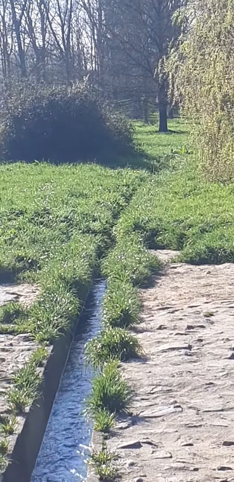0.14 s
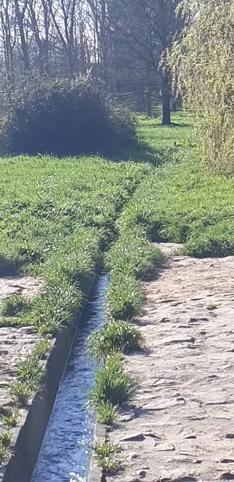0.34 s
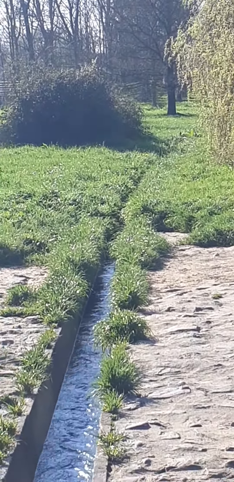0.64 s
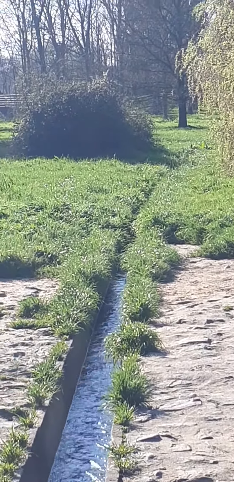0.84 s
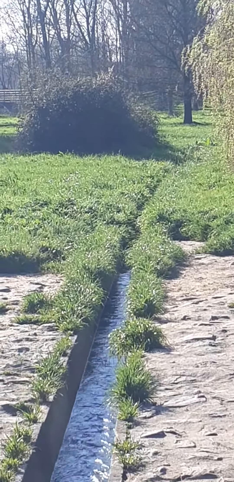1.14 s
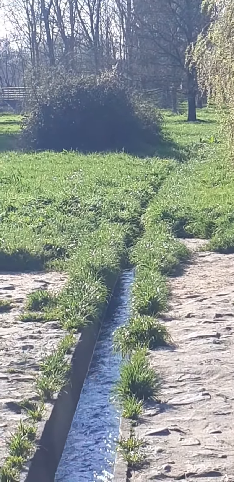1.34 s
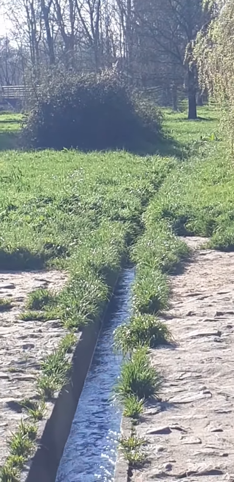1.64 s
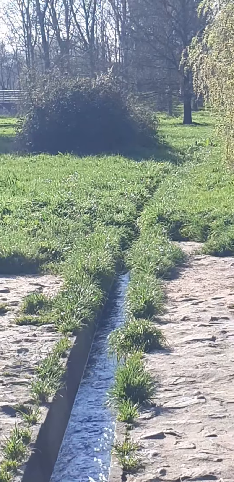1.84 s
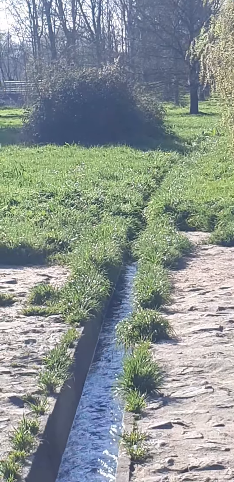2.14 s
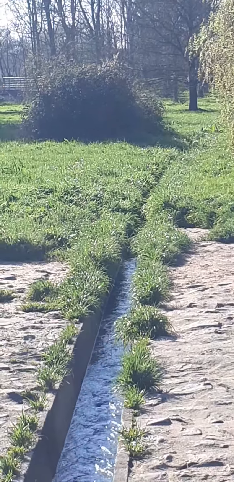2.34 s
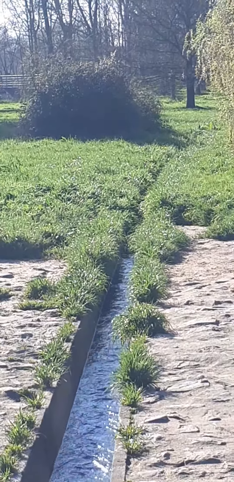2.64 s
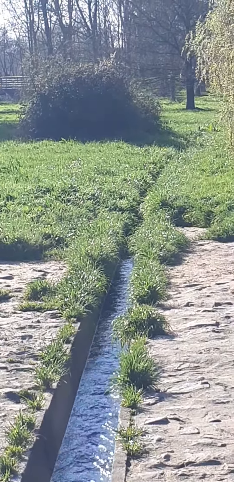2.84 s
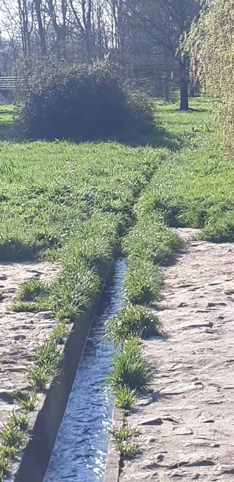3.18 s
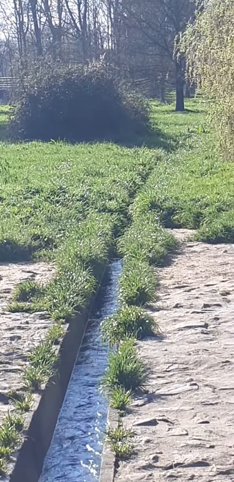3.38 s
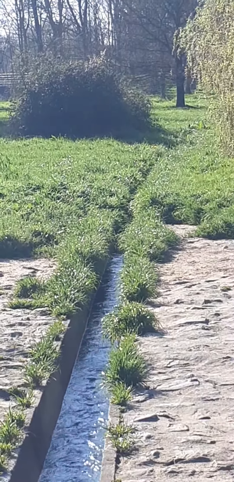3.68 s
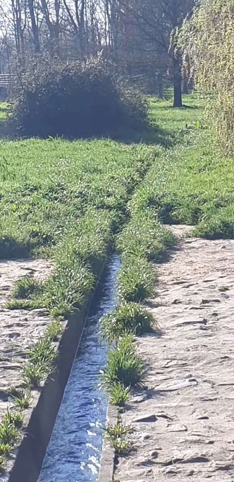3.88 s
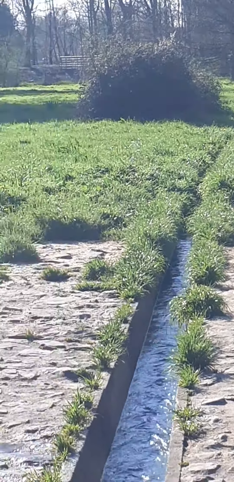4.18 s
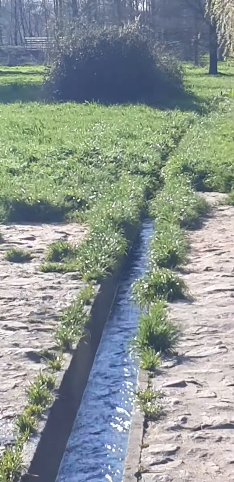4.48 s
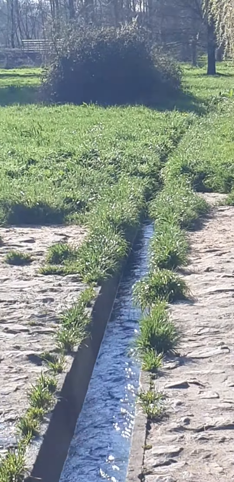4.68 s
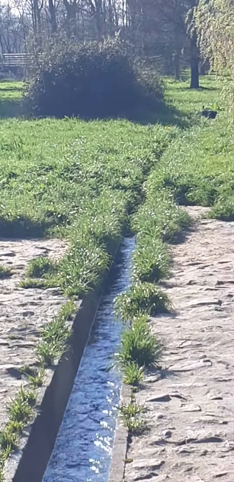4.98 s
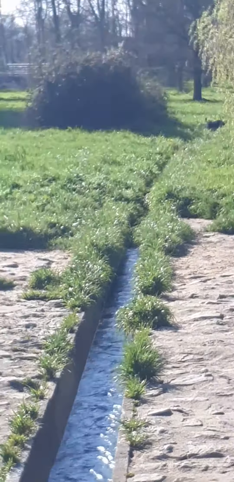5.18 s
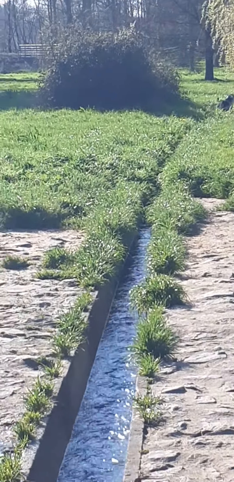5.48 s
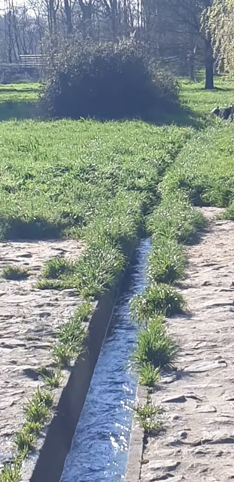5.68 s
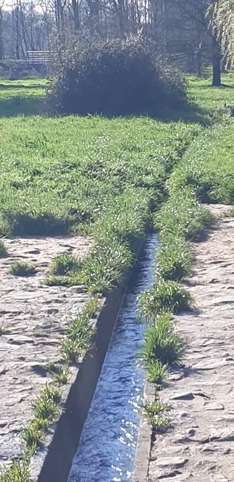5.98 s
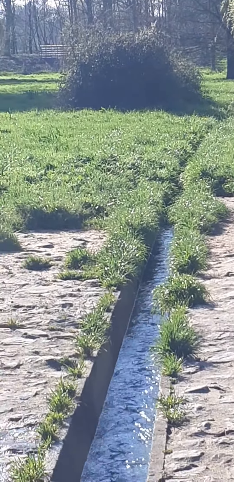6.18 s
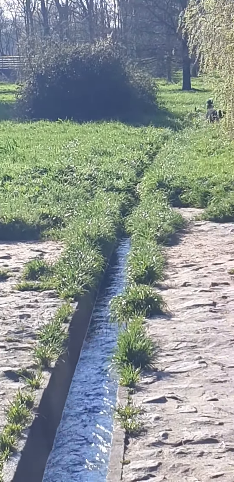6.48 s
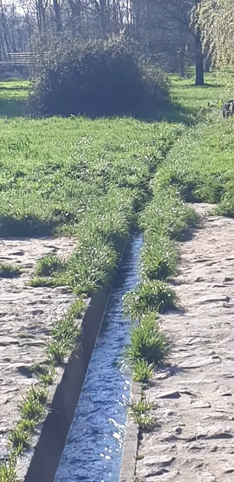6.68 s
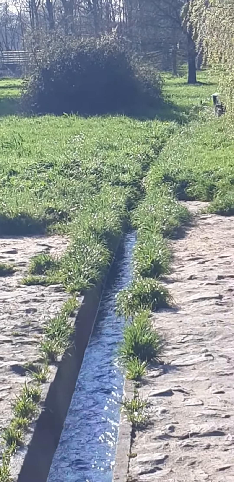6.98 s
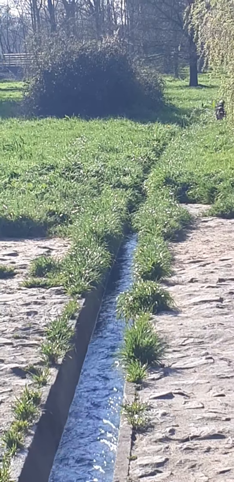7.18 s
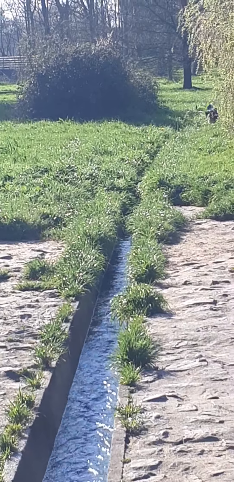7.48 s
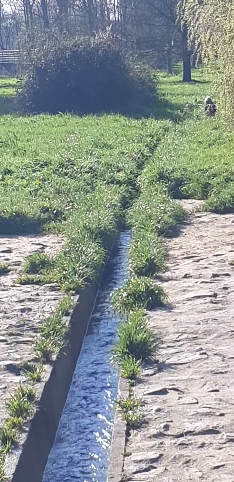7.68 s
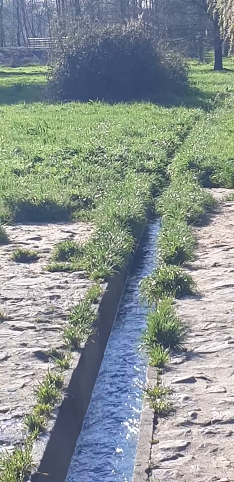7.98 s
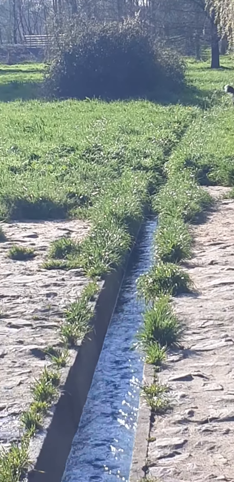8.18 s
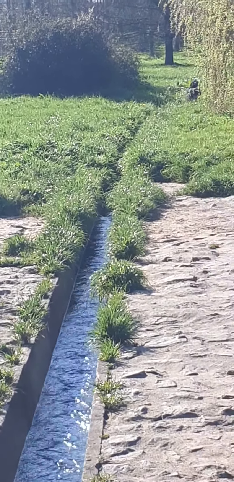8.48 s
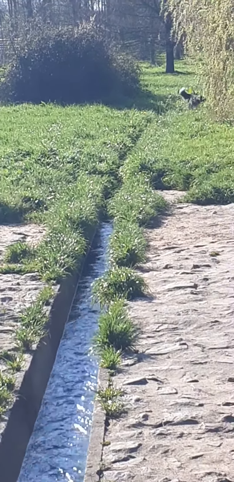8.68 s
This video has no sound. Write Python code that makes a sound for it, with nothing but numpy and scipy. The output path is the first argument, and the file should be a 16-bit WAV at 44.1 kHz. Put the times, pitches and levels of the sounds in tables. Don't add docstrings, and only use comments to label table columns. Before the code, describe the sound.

Water trickles and plops along a shallow stone channel while a far engine hums away, then a sharp knock and finger fumbling hit the microphone.

```python
import sys
import numpy as np
from scipy import signal
from scipy.fft import rfft, irfft, next_fast_len
from scipy.io import wavfile
from scipy.ndimage import uniform_filter1d

SR = 44100
rng = np.random.default_rng(int(sys.argv[2]) if len(sys.argv) > 2 else 0)


def transcribe(u):
    v = np.clip(np.atleast_2d(u).T, -1, 1)
    q = np.round(v * 32767).astype(np.int16)
    wavfile.write(sys.argv[1], SR, q)


def invert_db(x):
    u = np.asarray(x, float) / 20
    return 10 ** u


N = 389403


def rms_one(x):
    return x / np.sqrt(np.mean(x ** 2) + 1e-20)


def in_time(rows):
    t_s, *columns = np.transpose(rows)
    return [np.interp(np.arange(N) / SR, t_s, c) for c in columns]


def at_hz(points, hz):
    f_hz, level_db = np.array(points).T
    return np.interp(np.log(hz), np.log(f_hz), level_db)


def drift(rate_hz):
    step, settle = 40, 2000
    r = np.exp(-2 * np.pi * step * rate_hz / SR)
    coarse = rng.standard_normal(N // step + settle + 2)
    slow = signal.lfilter([1], [1, -2 * r, r * r], coarse)[settle:]
    return np.interp(np.arange(N) / step, np.arange(len(slow)), rms_one(slow))


def coloured(x, spectrum):
    size = next_fast_len(N)
    hz = np.maximum(np.fft.rfftfreq(size, 1 / SR), 1)
    return rms_one(irfft(rfft(x, size) * invert_db(at_hz(spectrum, hz)), size)[..., :N])


def filtered(x, order, hz, kind="low"):
    return signal.sosfilt(signal.butter(order, hz, kind, fs=SR, output="sos"), x)


def add(track, t_s, sound):
    i = round(t_s * SR)
    track[i:i + len(sound)] += sound[:N - i]


def glide(lead_s, start_hz, end_hz, glide_s, ring_s, rise_s):
    t = np.arange(round((lead_s + ring_s) * SR)) / SR - lead_s
    turns = end_hz * t + (start_hz - end_hz) * glide_s * (1 - np.exp(-t / glide_s))
    choke = invert_db(-60 * (np.maximum(t, 0) / ring_s) ** 2.2)
    rise = np.clip((t + lead_s) / rise_s, 0, 1) ** 2
    jolt = np.sin(2 * np.pi * turns) * choke * rise
    return jolt / np.max(np.abs(jolt))


# t/s, level/dB
GAIN = [(0, -0.5), (4.4, -1), (4.6, -17), (4.9, -4.5), (5.4, -7), (5.8, -1), (6.6, -0.5), (8.83, -1)]


def gain_db():
    return in_time(GAIN)[0]


# t/s, level/dB
SEAL = [(0, -11), (1, -15.5), (1.9, -13), (2.4, -16.5), (3.9, -13.5), (4.4, -11), (5.2, -22), (5.5, -27),
        (6.3, -33), (7.1, -32), (8.83, -38)]


def seal_db():
    return in_time(SEAL)[0]


# f/Hz, level/dB per Hz
RUMBLE = [(20, -25), (45, -11), (80, 1), (120, -3), (170, -6.5), (240, -7), (330, -18), (500, -29),
          (900, -53.5)]
# f/Hz, level/dB per Hz
COVERED_RUMBLE = [(20, -25), (45, 1), (90, 4.5), (130, 0.5), (180, -12.5), (260, -18.5), (350, -25),
                  (900, -55)]
# t/s, level/dB
TRAFFIC = [(0, -51.5), (.8, -48.5), (2, -53), (2.9, -54), (3.6, -52.5), (4.3, -50.5), (5.2, -52), (6, -53),
           (6.7, -50.5), (7.2, -53), (7.7, -55.5), (8.3, -54), (8.83, -56)]
# t/s, half width/s, rise/dB
TREMBLES = [
    (.8, .4, 3),
    (2.9, .3, 3),
    (4.8, .7, 11),
    (5.9, .3, 4),
    (6.6, .3, 3),
    (7.7, .2, 6),
]


def rumble(alike):
    shared, left, right = rng.standard_normal((3, N))
    white = np.sqrt(alike) * shared + np.sqrt(1 - alike) * np.array([left, right])
    low = coloured(white, RUMBLE)
    sealed = np.clip((-15 - seal_db()) / 10, 0, 1)
    low[1] += sealed * (coloured(white[1], COVERED_RUMBLE) - low[1])
    t = np.arange(N) / SR
    right_db = -5.5 + sum(db * np.exp(-((t - t_s) / half_s) ** 2) for t_s, half_s, db in TREMBLES)
    port_db = np.array([np.zeros(N), right_db])
    lumps_db = 2.1 * np.array([drift(6), drift(8)])
    return low * invert_db(in_time(TRAFFIC)[0] + port_db + lumps_db)


# t/s, firing f/Hz, first order level/dB
ENGINE = [(0, 63, -57), (.5, 65.5, -54), (.9, 67, -50), (1.4, 68.7, -50), (1.55, 68.7, -51), (2, 67.3, -54),
          (2.8, 61, -54), (3.3, 57.5, -55), (3.6, 55.7, -57), (4.1, 54, -59), (4.4, 53, -90)]
# from t/s, orders 2, 3, 4, 5 re first order/dB
LOAD = [
    (0, .5, -2.5, -15, -16),
    (.6, .5, -2.5, -19, -28),
    (1.5, -9, -9, -18, -28),
    (1.8, -7, -13, -20, -28),
    (2.4, 2.5, -15, -18, -26),
    (3.2, 2, -7, -13, -12),
    (3.45, -3, -6, -13, -14),
]


def engine():
    hz, first_db = in_time(ENGINE)
    load = np.array(LOAD)
    state = load[np.searchsorted(load[1:, 0], np.arange(N) / SR), 1:].T
    change_s = .25
    levels_db = [first_db, *(first_db + uniform_filter1d(state, round(change_s * SR)))]
    phase = 2 * np.pi * np.cumsum(hz + .1 * drift(2)) / SR
    waver_db = [.8 * drift(3) for _ in levels_db]
    out = np.zeros((2, N))
    for k, db in enumerate(levels_db):
        tone = np.sqrt(2) * invert_db(db + waver_db[k]) * np.sin((k + 1) * phase)
        out += tone * invert_db([[.52 * k], [-.7 * k]])
    return out


def knock():
    out, t_s = np.zeros((2, N)), 4.4172
    add(out[0], t_s - .0007, invert_db(-.5) * glide(.0007, 800, 190, .0036, .0066, rise_s=.0006))
    add(out[0], t_s - .0008, invert_db(-17.5) * glide(.00019, 2420, 1400, .0015, .0025, rise_s=.0003))
    add(out[1], t_s - .0012, invert_db(-12.5) * glide(.0002, 900, 760, .00078, .0045, rise_s=.0003))
    add(out[1], t_s - .0001, invert_db(-6) * glide(.002, 260, 98, .006, .0075, rise_s=.0018))
    return signal.sosfiltfilt(signal.butter(4, 5800, fs=SR, output="sos"), out)


# t/s, peak level/dB, start f/Hz, ring/ms
THUMPS = [(0.7904, -35, 131, 110), (0.8162, -36, 130, 25), (0.8326, -29, 140, 53), (3.9852, -29.5, 110, 69),
          (4.2612, -29.5, 150, 100), (4.4295, -27, 150, 70), (4.439, -29, 140, 69), (4.551, -31, 304, 90),
          (4.0733, -25, 200, 30), (4.458, -28, 200, 50), (4.634, -25, 250, 40), (4.6395, -24, 200, 50),
          (4.7395, -28, 200, 50), (4.758, -27, 180, 50), (4.8083, -23, 200, 40), (4.8237, -17, 230, 50),
          (4.8312, -19, 300, 30), (4.8436, -20, 330, 40), (4.8617, -20, 300, 25), (4.8708, -22, 300, 60),
          (4.8805, -28, 120, 130), (5.1555, -26, 300, 30), (4.5952, -18.5, 278, 57), (4.6123, -28, 400, 54),
          (4.8363, -15, 222, 67), (4.866, -11.5, 247, 76), (5.0395, -23, 247, 135), (5.0757, -31, 300, 150),
          (5.1408, -15.5, 296, 51), (5.1497, -21.5, 286, 62), (5.324, -22, 160, 39), (5.374, -29, 160, 48),
          (5.791, -38, 198, 60), (5.806, -33.5, 210, 90), (5.9377, -31, 90, 30), (6.1323, -38, 120, 130),
          (6.3081, -16, 160, 130), (7.216, -25.5, 138, 100), (7.3512, -25.5, 136, 116),
          (7.3944, -34, 110, 110), (7.409, -33, 130, 89), (7.681, -40, 131, 60), (5.4144, -39, 160, 48)]
# t/s, peak level/dB, start f/Hz, ring/ms
LIFTS = [(0.7603, -34, 110, 130), (4.0663, -29, 150, 29), (4.0825, -22.5, 151, 78), (4.0996, -28, 200, 81),
         (4.1132, -33, 170, 55), (4.1959, -20, 226, 32), (4.2443, -39, 394, 75), (4.5708, -15, 130, 45),
         (4.794, -25, 200, 40), (4.8017, -21, 160, 60), (4.8472, -31, 308, 67), (4.972, -35.5, 130, 100),
         (5.2866, -40, 110, 85), (5.7365, -45, 250, 57), (6.047, -42, 300, 40), (6.47, -42, 150, 50),
         (5.9846, -33, 161, 65), (6.3072, -22, 362, 60), (6.346, -21.5, 290, 120), (7.877, -42, 150, 55)]


def thumping():
    out = np.zeros(N)
    for way, rows in ((1, THUMPS), (-1, LIFTS)):
        for t_s, db, hz, ms in rows:
            jolt = glide(.0022, 1.32 * hz, 86.6, .0035, .26 * ms / 1000, rise_s=.0021)
            add(out, t_s - .002, way * invert_db(db) * jolt)
    slap_s, slap_db = 4.5692, -11
    add(out, slap_s - .0004, invert_db(slap_db) * glide(.0001, 700, 500, .001, .0016, rise_s=.0003))
    return out


def stroke_db(rows, peaks_db, haste):
    peak_s, *_, swell_s, fade_s = np.transpose(rows)[..., None]
    let_go_s, let_go_db_per_s = 4.87, 1000
    t = np.arange(0, N / SR, .0005)
    gone_db = let_go_db_per_s * np.maximum(t - let_go_s, 0) * (peak_s < let_go_s)
    slope_db = 10 * np.maximum((peak_s - t) / swell_s, (t - peak_s) / fade_s)
    level_db = peaks_db[:, None] - haste * (slope_db + gone_db)
    return np.interp(np.arange(N) / SR, t, level_db.max(axis=0))


# peak t/s, low level/dB, bright level/dB, swell/s per 10 dB, fade/s per 10 dB
STROKES = [(4.429, -26, -31, .006, .01), (4.457, -34, -41, .008, .015), (4.5, -35, -47, .03, .1),
           (4.576, -24, -31, .032, .03), (4.62, -31, -40, .04, .1), (4.72, -34, -43, .2, .2),
           (4.845, -27, -33, .04, .03), (4.876, -34, -50, .005, .04), (4.422, -40, -36, .002, .02),
           (4.083, -42, -80, .01, .01), (5.145, -27, -49, .013, .012)]
# f/Hz, level/dB per Hz
RUB_LOW = [(25, -30), (60, -8), (130, 0), (250, -5), (500, -9), (1000, -18), (2000, -31), (4000, -60)]
# f/Hz, level/dB per Hz
RUB_BRIGHT = [(500, -30), (1200, 0), (2500, -4), (4500, -11), (7300, -29), (10000, -16), (13000, -6),
              (14500, 0), (15600, -3), (17000, -10)]


def rubbing(slips):
    low_db = stroke_db(STROKES, np.array(STROKES)[:, 1], haste=1)
    bright_db = stroke_db(STROKES, np.array(STROKES)[:, 2], haste=1.5)
    low = invert_db(low_db) * coloured(rng.standard_normal(N) * slips, RUB_LOW)
    bright = invert_db(bright_db) * coloured(rng.standard_normal(N) * slips ** .7, RUB_BRIGHT)
    return low + bright


# t/s, peak level/dB
SNAPS = [(4.427, -26), (4.431, -22), (4.495, -24), (4.5535, -21), (4.5595, -11.5), (4.574, -16),
         (4.5765, -12), (4.58, -22), (4.7395, -22), (4.6065, -28), (4.644, -24), (4.845, -18), (4.865, -12),
         (7.317, -52)]


def snapping():
    clicks, decay_samples = np.zeros(N), 6
    for t_s, db in SNAPS:
        add(clicks, t_s, invert_db(db) * rng.choice([-1, 1], 60) * np.exp(-np.arange(60) / decay_samples))
    level = invert_db(-1.5) * np.sqrt(np.mean(clicks ** 2))
    return level * coloured(signal.lfilter([1, -.35], [1], clicks), RUB_BRIGHT)


# peak t/s, level/dB, swell/s per 10 dB, fade/s per 10 dB
PALM = [
    (4.09, -46, .02, .03),
    (4.197, -36, .002, .006),
    (4.43, -36, .008, .035),
    (4.555, -39, .04, .03),
    (4.64, -40, .012, .02),
    (4.72, -47, .05, .05),
    (4.84, -31, .035, .03),
    (4.876, -33, .001, .002),
    (4.885, -42, .004, .03),
    (5.145, -50, .01, .02),
]
# f/Hz, level/dB per Hz
PALM_COLOUR = [(30, -25), (90, -6), (200, 0), (500, -3), (1000, -12), (2500, -28), (6000, -60)]


def palm(slips):
    level_db = stroke_db(PALM, np.array(PALM)[:, 1], haste=1)
    return invert_db(level_db) * coloured(rng.standard_normal(N) * slips, PALM_COLOUR)


def finger():
    thumps = thumping()
    slips = invert_db(2.2 * drift(63))
    right = thumps + rubbing(slips) + snapping()
    left = palm(slips) + invert_db(-46) * thumps
    return np.array([left, right])


# t/s, peak level/dB, f/Hz
GULPS = [(0.541, -35.5, 934), (0.586, -30.5, 756), (0.587, -34, 1225), (0.973, -38, 775),
         (1.481, -37, 1165), (1.678, -33, 952), (1.74, -39.5, 670), (1.992, -35, 683), (2.018, -31, 1210),
         (2.719, -35, 674), (3.163, -31, 1280), (3.538, -38, 560), (3.603, -38, 880), (3.908, -33, 664),
         (7.445, -39, 633), (2.408, -34, 820), (3.024, -44, 557), (8.163, -39, 596), (2.885, -43, 620),
         (8.212, -39.5, 556), (6.716, -36, 980), (6.214, -34, 626), (6.673, -34, 763), (6.984, -34, 885),
         (7.084, -32.5, 830), (7.24, -36.5, 640), (7.738, -30, 1125), (7.816, -45, 555), (7.898, -39, 594),
         (8.777, -35, 1210)]
# t/s, peak level/dB, f/Hz
PLOPS = [(0.17, -34, 1730), (0.475, -28, 1880), (1.795, -34, 1640), (1.851, -27, 2030),
         (2.081, -28.5, 2250), (2.426, -32, 1590), (2.561, -30, 1440), (2.749, -30, 1400),
         (2.857, -32, 1920), (3.147, -30, 2240), (3.303, -31.5, 1490), (3.389, -33, 2030),
         (3.534, -31.5, 2020), (3.588, -32.5, 2630), (4.489, -31, 2050), (5.349, -26, 1510),
         (6.358, -32.5, 2430), (6.497, -32.5, 1920), (6.788, -32, 1790), (6.957, -30.5, 1880),
         (7.127, -28.5, 1460), (7.819, -33, 2130), (7.896, -35, 1740), (7.934, -31.5, 1730),
         (8.007, -32.5, 1770), (8.35, -31, 1630), (8.357, -32.5, 2410), (8.584, -31, 1570),
         (8.622, -30, 1415), (8.665, -32, 1950)]
# t/s, peak level/dB, f/Hz
TICKS = [(0.699, -37.5, 3280), (1.447, -38, 2840), (3.326, -36, 2820), (3.383, -41, 5100),
         (3.405, -42, 5320), (7.474, -34, 2200), (7.739, -34, 2390), (6.708, -31.5, 3140),
         (6.89, -31, 2970), (7.857, -44, 4100), (7.913, -43, 4600), (7.993, -42, 4770), (8.183, -36, 2570),
         (8.194, -34, 1730), (8.264, -42, 5100), (8.267, -33, 1400), (8.36, -43, 5300), (8.737, -42, 5400),
         (5.46, -40, 4700), (5.388, -42, 4200), (5.04, -41, 3700), (4.98, -44, 5200), (5.79, -46, 5000),
         (6.298, -43, 5000), (6.394, -42, 4700)]
# t/s, peak level/dB, f/Hz
BLIPS = [(0.086, -39, 1180), (0.191, -41, 990), (0.196, -42, 750), (0.244, -38, 1210), (0.347, -42, 670),
         (0.446, -40, 1310), (0.491, -41, 1140), (0.56, -39, 1250), (0.648, -40, 950), (0.694, -40, 1230),
         (0.72, -40, 820), (0.856, -39, 1230), (1.289, -41, 1120), (1.643, -41, 950), (1.683, -38, 1250),
         (1.773, -40, 620), (1.957, -39, 1340), (2.244, -43, 540), (2.672, -40, 730), (2.811, -39, 1270),
         (3.163, -42, 690), (3.418, -42, 540), (3.692, -41, 900), (3.88, -43, 520), (3.967, -39, 1120),
         (4.095, -44, 470), (4.109, -39, 690), (4.126, -41, 1030), (4.14, -42, 600), (4.183, -37, 1340),
         (4.193, -35, 540), (4.208, -38, 600), (4.231, -39, 650), (4.276, -39, 650), (5.229, -40, 500),
         (5.384, -34, 1310), (5.696, -43, 990), (6.329, -41, 820), (6.565, -40, 1100), (6.756, -37, 1250),
         (6.778, -41, 710), (6.957, -40, 1030), (7.043, -38, 730), (7.293, -41, 1100), (7.342, -38, 1270),
         (7.586, -40, 1100), (7.69, -40, 1310), (8.267, -40, 800), (8.352, -37, 1250), (8.366, -39, 1250),
         (8.442, -36, 1290), (8.484, -41, 690), (8.56, -36, 1250), (8.756, -39, 970), (8.763, -41, 750)]
# t/s, peak level/dB, f/Hz
PIPS = [(0.292, -37, 2150), (0.477, -35, 2220), (0.532, -35, 1870), (0.608, -44, 3120), (0.938, -39, 2610),
        (1.121, -36, 1720), (1.444, -37, 2090), (1.444, -37, 2280), (1.682, -37, 1680), (1.755, -36, 1380),
        (1.851, -36, 2330), (2.522, -44, 3040), (2.683, -37, 2130), (2.719, -40, 2650), (2.798, -43, 2780),
        (3.127, -37, 2220), (3.149, -35, 2000), (3.168, -37, 2240), (3.263, -44, 3060), (3.324, -36, 2350),
        (3.57, -37, 1790), (3.853, -37, 1830), (4.187, -39, 2560), (4.339, -37, 1570), (4.366, -37, 1700),
        (5.019, -34, 1550), (5.122, -35, 1740), (5.702, -38, 2370), (5.873, -37, 1640), (6.173, -37, 1590),
        (6.234, -38, 2110), (6.301, -36, 2110), (6.369, -35, 1610), (6.667, -35, 1400), (6.671, -37, 2170),
        (6.699, -36, 2020), (6.708, -34, 1770), (6.802, -34, 1420), (7.061, -37, 2560), (7.093, -37, 1770),
        (7.17, -38, 1940), (7.188, -43, 3080), (7.242, -36, 2070), (7.387, -41, 2670), (7.401, -36, 1440),
        (7.603, -36, 1660), (7.967, -38, 2330), (8.18, -37, 2260), (8.184, -38, 2650), (8.235, -36, 1850),
        (8.343, -37, 2300), (8.359, -49, 5190), (8.36, -51, 4890), (8.4, -37, 2050), (8.673, -37, 2240)]


def plops(rise, ring):
    out, t = np.zeros(N), np.arange(round(.1 * SR)) / SR
    when, size, force, climb = rng.random((110, 4)).T
    stray_db = -41 + 2 * (2 * force - 1) - 4 * size ** 2
    low_hz, high_hz = 850, 3200
    strays = zip(when * (N / SR - .1), stray_db, low_hz * (high_hz / low_hz) ** size, .1 * climb)
    placed = [(*row, rise) for row in GULPS + PLOPS + TICKS + BLIPS + PIPS]
    for t_s, db, hz, climbs in placed + list(strays):
        linger = 1 + .2 * max(0, -37 - db) * (hz < 1000)
        ring_s = np.clip(7.5 / hz, .0042, .009) * linger
        lasts_s = ring * ring_s * min(1, 1600 / hz)
        fade = np.exp(-t / lasts_s) * (1 - np.exp(-t * hz / .71))
        tone = np.sin(2 * np.pi * hz * t * (.985 + climbs * t / lasts_s))
        level = invert_db(db + 2.5 + 2.1 * np.log10(max(1, hz / 1600)))
        add(out, t_s + .0037 - .454 * ring_s, level * fade * tone)
    return out


# f/Hz, level/dB per Hz
WATER = [(180, -54), (300, -21), (377, -9.5), (409, -25.5), (474, -8.5), (573, -4.5), (881, -3.5),
         (1220, 0.5), (1800, -3), (2390, -3), (3430, -19), (5280, -24), (7500, -73.5), (9750, -76),
         (16500, -120)]


def bubbles(per_s, spread_db, cycles, clump_db, count):
    born = rng.random(N) < per_s * invert_db(clump_db * drift(25)) / SR
    sizes = born * invert_db(spread_db * np.minimum(rng.exponential(1, N), 4)) * rng.choice([-1, 1], N)
    dealt = (count * rng.random(N) ** .6).astype(int)
    out = np.zeros(N)
    for k, hz in enumerate(np.geomspace(400, 6500, count)):
        r, w = invert_db(-60 * hz / (cycles * SR)), 2 * np.pi * hz / SR
        ringing = [1, 0, 0, 1, -2 * r * np.cos(w), r * r]
        soft = [1, 0, -1, 1, -2 * r ** 2 * np.cos(w), r ** 4]
        ring = signal.sosfilt([ringing, soft], sizes * (dealt == k) + 1e-18)
        out += rms_one(ring) * invert_db(at_hz(WATER, hz)) * np.sqrt(hz)
    return rms_one(out)


def splashes(per_s, lasts_s):
    slaps = (rng.random(N) < per_s / SR) * invert_db(2.5 * np.minimum(rng.exponential(1, N), 3))
    slaps[[round(row[0] * SR) for row in GULPS + PLOPS + TICKS]] += invert_db(3)
    puffs = signal.lfilter([1], [1, -np.exp(-1 / (lasts_s * SR))], slaps)
    return coloured(puffs * rng.standard_normal(N), WATER)


# t/s, level/dB
FLOW = [
    (0.0, -51.5),
    (0.27, -54),
    (4.28, -54),
    (4.48, -54),
    (5.39, -58),
    (6.62, -53),
    (8.53, -54),
    (8.83, -53.5),
]


def stream():
    rush = invert_db(-9) * coloured(rng.standard_normal(N), WATER)
    gurgle = invert_db(-3.5) * bubbles(per_s=850, spread_db=2.5, cycles=34, clump_db=3, count=30)
    fizz = invert_db(-6) * bubbles(per_s=1500, spread_db=2, cycles=8.3, clump_db=5, count=14)
    splash = invert_db(-10) * splashes(per_s=25, lasts_s=.004)
    spray = invert_db(-8) * filtered(splashes(per_s=70, lasts_s=.0015), 3, 2900, "high")
    lapping_db = .6 * drift(8)
    bed_db = in_time(FLOW)[0] - gain_db() + 9.5 + lapping_db
    bed = invert_db(bed_db) * (rush + gurgle + fizz + splash + spray)
    water = filtered(bed, 4, 440, "high") + plops(rise=.02, ring=1.1)
    cavity = signal.butter(9, 1400, fs=SR, output="sos")
    dull = signal.filtfilt([.085], [1, -.915], signal.sosfiltfilt(cavity, water))
    lag_samples = 11
    return np.array([water, invert_db(seal_db() + 13) * np.roll(dull, lag_samples)])


def scene():
    return invert_db(gain_db()) * (stream() + engine() + rumble(alike=.56)) + finger() + knock()


def top_cut(x):
    return signal.sosfilt(signal.butter(12, 16650, fs=SR, output="sos"), x)


# f/Hz, level/dB per Hz
HISS = [(300, -1), (1500, 1), (4000, 0), (7500, -1), (10000, 0), (14000, 4.5), (15800, 3.5)]


def record(dry):
    hiss = invert_db(-72.5 + gain_db()) * coloured(rng.standard_normal((2, N)), HISS)
    cutoff_hz = 16150
    mix = signal.sosfilt(signal.cheby2(14, 60, cutoff_hz, fs=SR, output="sos"), dry + hiss)
    return top_cut(mix)


dry = scene()
out = record(dry)
transcribe(out)
```